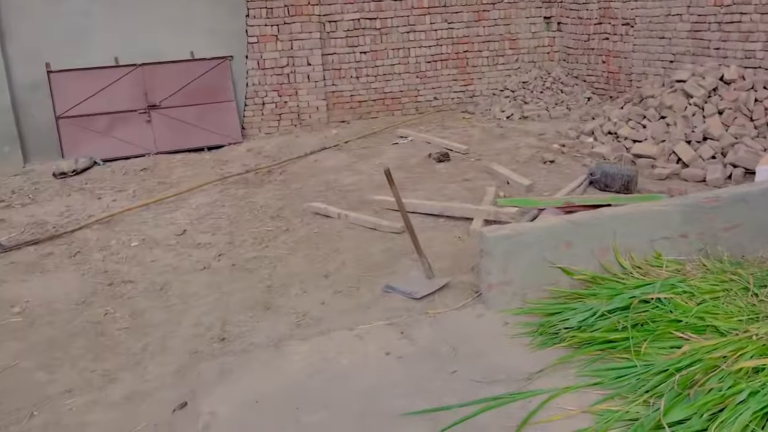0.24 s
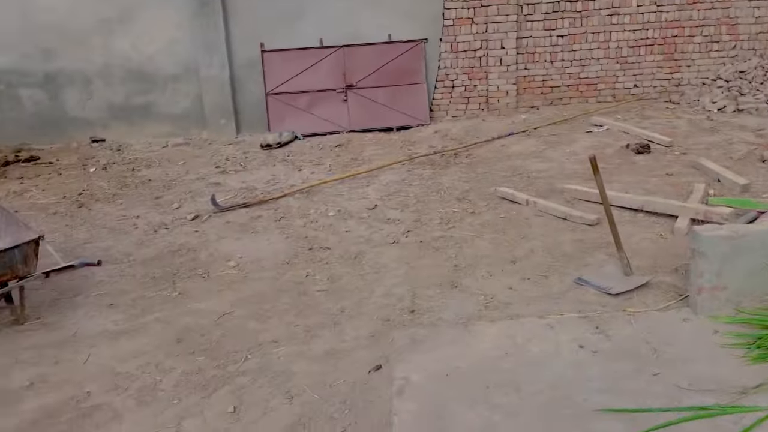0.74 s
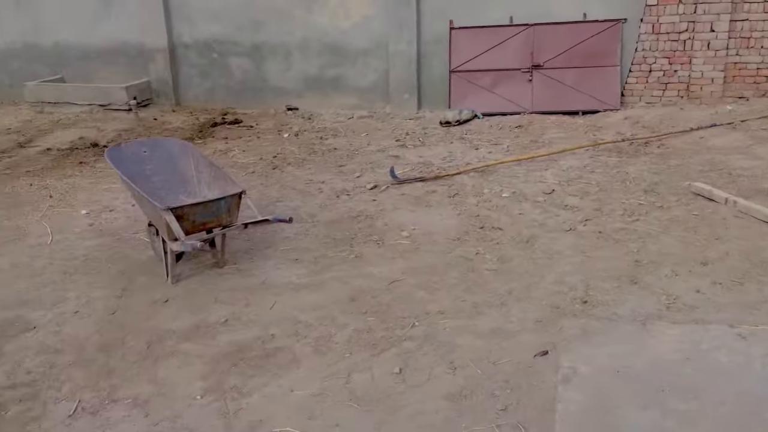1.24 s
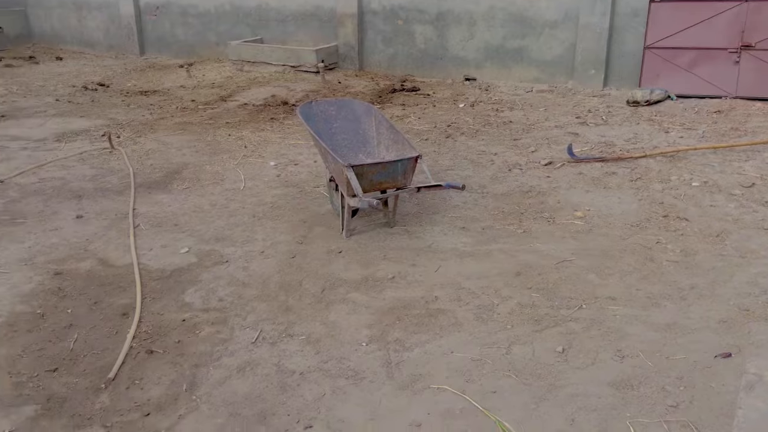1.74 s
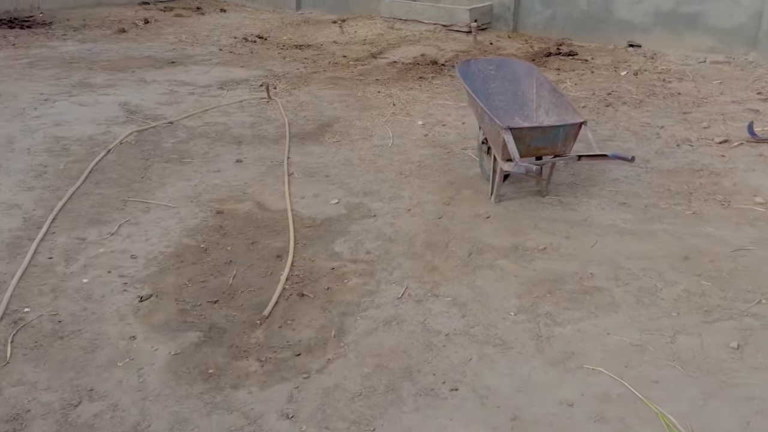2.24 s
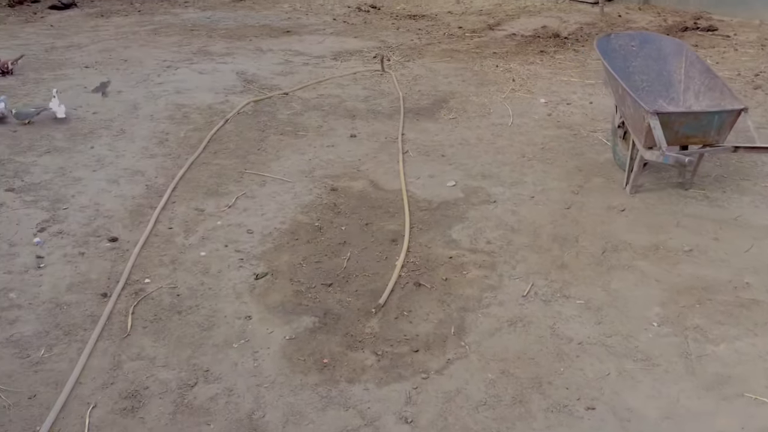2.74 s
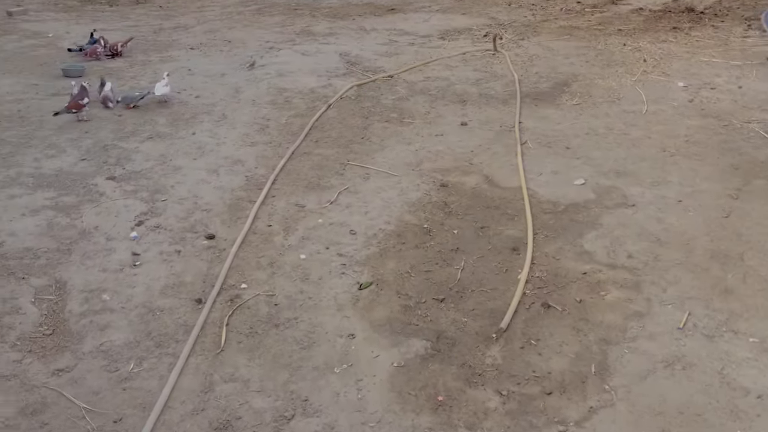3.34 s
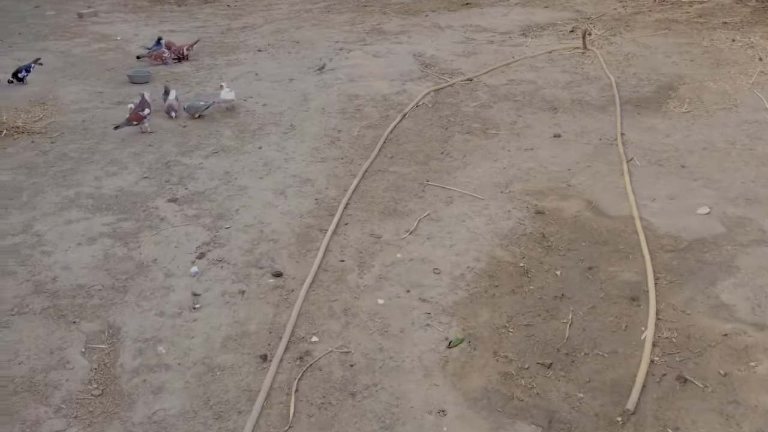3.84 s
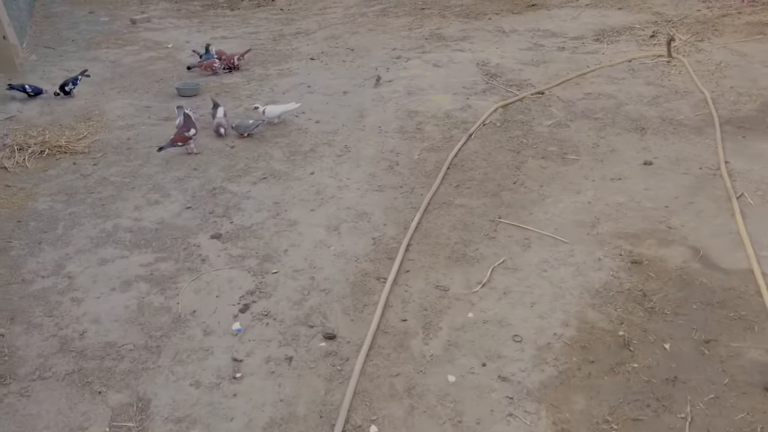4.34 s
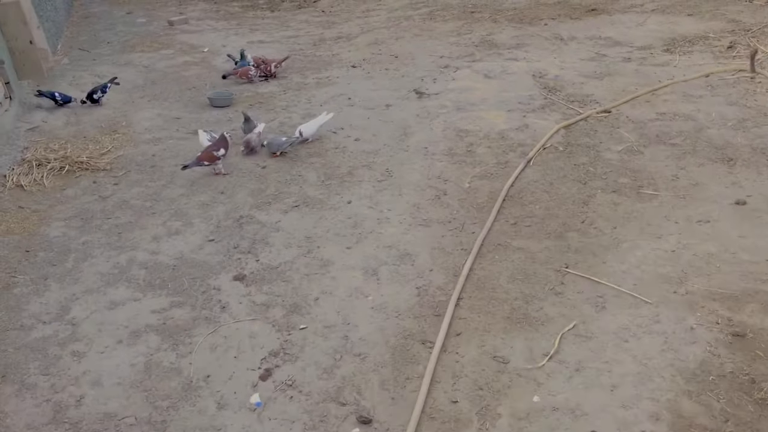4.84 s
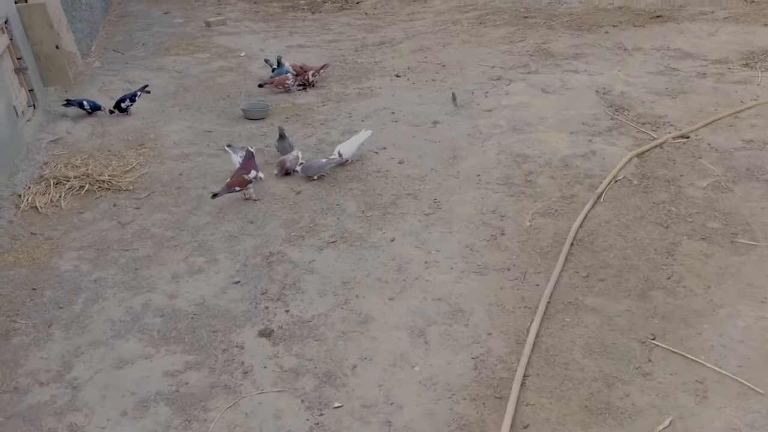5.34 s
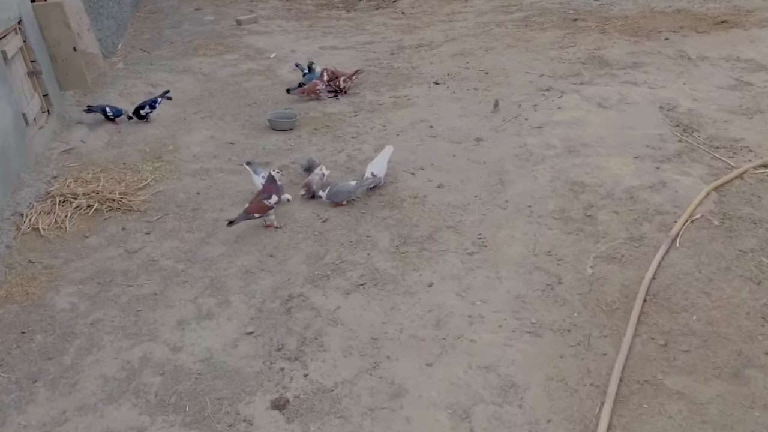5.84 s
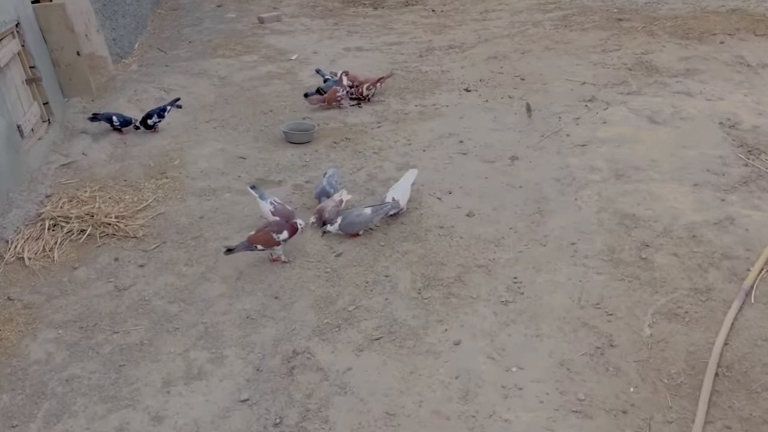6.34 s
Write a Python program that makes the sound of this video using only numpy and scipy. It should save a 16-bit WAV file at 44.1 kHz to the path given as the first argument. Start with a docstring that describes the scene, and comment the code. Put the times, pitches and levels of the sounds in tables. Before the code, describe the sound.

An electric chaff cutter chops green stalks in fast even crunching strokes, gears rattling, fading across a walled yard as wind puffs buffet the microphone.

```python
"""Chaff cutter in a walled yard

An electric chaff cutter chops green fodder, nearly five strokes a second: crowds of short stalk snaps, shaped by
the force of each blade, ring the iron frame. Gears rattle and whine as filtered clicks over a two-partial motor hum.
A hand-held phone turns and moves off; the machine grows fainter, with a brief return near 6.2 s, and echo fills in.
Wind puffs are short falling tones over a noise rumble; scuffs are bands of noise; a small bird chirps twice."""
import sys
import numpy as np
from scipy import signal
from scipy.fft import rfft, irfft
from scipy.io import wavfile
from scipy.ndimage import uniform_filter1d, map_coordinates

SR = 44100
rng = np.random.default_rng(int(sys.argv[2]) if len(sys.argv) > 2 else 0)


def bounce(signal):
    """Save signal as a 16-bit WAV file at the path given by the first command-line argument."""
    frames = np.transpose(np.atleast_2d(signal))
    limited = np.clip(frames, -1, 1)
    pcm = np.round(limited * 32767).astype(np.int16)
    wavfile.write(sys.argv[1], SR, pcm)


N = 291059
TIME = np.arange(N) / SR
FREQS = np.fft.rfftfreq(N, 1 / SR) + 1e-3  # Hz, kept off zero

# distance from the machine and turn of the phone, which runs 0-1: [time_s, distance_m, turned_away]
WALK = [(0, 1.6, 0.03), (1, 2.62, 0.01), (1.9, 2.52, 0.06), (2.4, 3.08, 0.22), (3.5, 4.22, 0.7),
        (4.2, 4.84, 0.64), (5.4, 6.28, 0.85), (6.2, 4.2, 0.7), (6.6, 6.4, 0.87)]
# the phone's two ports: [freq_hz, left_lead_rad, likeness (0-1), left_minus_right_db]
PORTS = [(100, 0, .6, 0), (270, -.8, .8, 1), (480, -1.75, .93, -1.5), (750, -2.35, .93, -3),
         (1350, -2.55, .9, -2.5), (2000, -3, .6, -1), (2400, 2, .55, -1), (3000, 1, .7, -.5),
         (4200, .3, .62, 3), (5100, 1.7, .45, 2), (5800, -1.6, .45, 0), (7000, -1.7, .5, 0),
         (7500, -2.5, .85, 0), (8000, -3.05, .99, 0), (8500, -3.14, 1, 0), (9100, -3.25, .99, 0),
         (10000, -3.9, .8, 0), (12500, -6.2, .82, 0)]
# strength of the breeze on the ports, before trim and gusts: [time_s, rumble_db]
BREEZE = [(0, -35), (1, -36), (1.9, -37), (2.6, -35), (3.5, -32), (3.75, -37.5), (4.1, -43), (5.2, -40.5),
          (6.6, -39.5)]
# puffs of wind on the ports: [centre_s, level_db, pitch_hz, length_s]
PUFFS = [(1.5, -27.5, 82.6, 0.026), (1.589, -26, 90, 0.02), (1.886, -21.5, 75, 0.012),
         (2.469, -17.5, 84, 0.015), (2.518, -18.5, 75, 0.012), (2.541, -27, 81, 0.0095),
         (2.68, -20.5, 94, 0.011), (2.706, -23, 209, 0.011), (2.795, -19, 119, 0.011),
         (2.828, -31, 55, 0.016), (2.868, -26, 266, 0.0087), (2.901, -23, 100, 0.01),
         (3.074, -16.5, 269, 0.019), (3.076, -14, 139, 0.01), (3.096, -16.5, 95, 0.011),
         (3.13, -23, 242, 0.008), (3.139, -18.5, 85, 0.023), (3.212, -17, 121, 0.012),
         (3.314, -19.5, 297, 0.0067), (3.356, -13, 84, 0.013), (3.406, -17.5, 105, 0.016),
         (3.444, -14, 114, 0.026), (3.506, -16, 132.4, 0.025), (3.532, -29, 90, 0.016),
         (3.567, -21, 85, 0.044), (3.598, -24, 131, 0.012), (3.657, -18.5, 116, 0.024),
         (3.877, -23.5, 112, 0.025), (4.426, -21, 112, 0.011), (4.743, -27, 109, 0.01),
         (5.079, -30, 95, 0.009), (5.39, -25.5, 116, 0.012), (5.645, -23, 150, 0.012),
         (6.226, -25, 84, 0.011), (6.274, -20, 81.6, 0.014), (6.305, -26, 300, 0.008),
         (6.361, -17.5, 250, 0.0066), (6.364, -17, 141, 0.0064), (6.387, -22.5, 286, 0.0039)]
# spectrum of the low wind rumble: [freq_hz, level_db]
RUMBLE_SPECTRUM = [(20, -58), (40, -2.5), (65, 2.5), (110, -2.5), (180, -9), (400, -21.5), (1000, -91)]
# spectra of the soft rush of air and of the turbulence inside a puff: [freq_hz, level_db]
RUSH_SPECTRUM = [(120, 4.0), (220, 9), (340, 3.5), (480, 2.5), (900, -48)]
FLUTTER_SPECTRUM = [(70, 7.5), (150, 2.0), (290, -2), (450, -13.5), (1200, -63)]
# two notes of a small bird: [start_s, level_db, pitch_hz]
CHIRPS = [(3.987, -37, 4000), (4.054, -31.5, 3950)]
# small scuffs, ticks and a longer rustle close by: [centre_s, level_db, centre_hz, width_octaves, length_s]
SCUFFS = [(2.125, -30.5, 1500, 0.78, 0.022), (3.702, -41, 6000, 0.71, 0.0051),
          (3.787, -41, 12000, 0.22, 0.045), (3.831, -34, 1940, 1, 0.023),
          (4.281, -38.5, 5800, 0.71, 0.0068), (4.282, -40, 12200, 0.64, 0.0066),
          (4.931, -33, 1810, 1.34, 0.057), (5.125, -31, 1490, 1, 0.024)]
# spectrum of the gear rattle: [freq_hz, level_db]
GEAR_SPECTRUM = [(110, 11.5), (220, 5), (500, 3), (700, 5.5), (950, 1), (1080, 3.5), (1300, 1.5),
                 (1600, 2.5), (2100, -1.5), (2550, -1.5), (4000, -10.5), (5600, -10.5), (7000, -11.5),
                 (9300, -11), (11500, -8), (14000, -77)]
# whine of the meshing gears: [pitch_hz, width_hz, level_db]
WHINE_MODES = [(860, 26, -3), (983, 15, -3.5), (1062, 19, 1), (1740, 70, -7.5), (2507, 50, -6.5)]
# dry stalks that split with a bright crack: [start_s, level_db, centre_hz]
CRACKS = [(0.048, -25, 3160), (0.470, -15, 2420), (0.538, -23, 2880), (0.899, -21, 2480),
          (1.154, -18, 3020), (1.327, -15.5, 3020), (1.59, -24, 3040), (1.792, -28, 2400),
          (1.815, -29, 2900), (2.011, -27, 2130), (2.25, -20.5, 2050), (2.611, -27, 2000),
          (3.042, -23, 2600), (3.125, -24.5, 2840), (3.906, -29, 2350), (3.984, -24, 2370),
          (4.747, -28, 2070), (4.77, -32, 2240), (4.844, -26, 2590), (5.701, -30, 2630), (6.054, -31, 2200),
          (6.461, -34, 2740)]
# thick stalks that knock against the mouth plate: [start_s, level_db, pitch_hz]
KNOCKS = [(0.045, -10, 453), (0.294, -10.5, 341), (0.472, -9.5, 451), (0.717, -11, 354), (0.936, -6.5, 579),
          (1.148, -3.5, 513), (1.369, -7.5, 560), (1.549, -12.5, 572), (1.766, -6.5, 555),
          (2.005, -11, 567), (2.177, -15, 745), (2.439, -22, 514), (2.607, -20, 636), (2.651, -21, 485),
          (2.839, -29, 766), (2.863, -24, 483), (3.471, -22, 507), (3.512, -14.5, 446), (3.905, -17.5, 433),
          (4.156, -24, 920), (4.333, -32, 686), (4.548, -18, 810), (4.837, -21, 850), (5.033, -24, 960),
          (5.192, -21.5, 653), (5.623, -30, 969), (5.873, -21, 840), (6.459, -20.5, 794)]
# blade strokes, one at each half turn of the flywheel: [start_s, extra_bite_db, extra_shear_db, extra_crunch_db]
STROKES = [(0.023, 1, 2.5, 1), (0.235, 2.5, 0, -1.5), (0.452, 3, 2, 1.5), (0.666, 0.5, -2, 0.5),
           (0.882, 2, 0, 0.5), (1.094, -1, 0, 0), (1.31, 3.5, 1.5, 3.5), (1.522, -0.5, 0.5, 1),
           (1.739, 1, 1.5, 3), (1.95, 1.5, 1, 0), (2.169, 3, 1, 1), (2.384, 4, -3, -0.5),
           (2.599, 4.5, -2.5, 3), (2.817, 0.5, -2, 2.5), (3.033, 5, 1, 4), (3.25, 3, 0, 2),
           (3.466, 3.5, -3, 2.5), (3.683, 0, 1.5, 4.5), (3.898, 4, -0.5, 3), (4.112, 1.5, -4, 1.5),
           (4.327, 5, -3.5, 1.5), (4.541, 0.5, 0, 2.5), (4.754, 2.5, 2, 5), (4.968, 4, -1, 5),
           (5.184, 5.5, -3, 3.5), (5.395, 3, -1, 0.5), (5.611, 3, 0, -8), (5.822, 4, -3, 0),
           (6.035, 2, 1, 4.5), (6.231, 2, -1.5, 4.5), (6.445, 0, 1, 5)]
# rings of the iron frame and flywheel: [pitch_hz, width_hz, level_db]
FRAME_MODES = [(363, 31, 0), (538, 56, 2), (665, 17, 5), (791.5, 24, 6.5), (952, 14, 5), (1237, 11, 7.5),
               (1677, 17, -9.5), (1827, 26, 1)]
# spectrum of the chop beside the machine: [freq_hz, level_db]
CHOP_NEAR_SPECTRUM = [(90, -11), (200, -2.5), (350, -7), (430, -3.5), (530, 2), (680, -5.5), (960, 3),
                      (1200, -3), (1500, -5.5), (2100, -18.5), (3200, -70)]
# spectrum of the chop across the yard: [freq_hz, level_db]
CHOP_FAR_SPECTRUM = [(90, -20), (200, 5.5), (310, 2), (450, -3), (560, -5.5), (800, -4), (1000, -1),
                     (1230, -2.5), (1500, -4.5), (2100, -8.5), (3200, -15.5)]
# spectrum of the crunching stalks: [freq_hz, level_db]
CRUNCH_SPECTRUM = [(1200, -1.5), (2100, 2), (2900, 6), (4000, -3.5), (5200, -2.5), (5600, -13), (6200, -1),
                   (7200, -8), (9500, -86)]
# spectrum of the chaff spray: [freq_hz, level_db]
SPRAY_SPECTRUM = [(4800, -6), (6000, 0), (8000, 1.5), (10000, 3), (11700, 1), (12800, -6), (14000, -17),
                  (15000, -26)]
# spectrum of the blade clack: [freq_hz, level_db]
CLACK_SPECTRUM = [(300, -10), (450, 2.0), (900, -5.0), (1800, 3.5), (3000, -42.0), (6000, -43)]

NEAR_M = 2  # distance at which the machine has no distance loss
TOP_HZ = 14900  # top of the phone's range
# the walker's body comes between phone and machine and shades the crunch and spray
SHADE_FROM_S, SHADE_TO_S, SHADE_DB = 1.2, 1.9, 7
# share by which the pitch of an eddy falls per length; level of the turbulence inside it
PUFF_SAG, PUFF_FLUTTER_DB = 0.48, -10
SCUFF_RISE = 0.59  # the swell of a scuff as a share of its length
# share by which a chirp starts high; time to settle; fade
CHIRP_DROP, CHIRP_GLIDE_S, CHIRP_DECAY_S = 0.156, 0.0035, 0.013
HUM_HZ, HUM_DB, HUM_AWAY_DB = 99.2, -39.5, -17  # mean pitch; base level at NEAR_M; change once turned away
GEAR_DB, GEAR_FALL = -28, 0.64  # base level at NEAR_M; share of the distance loss, as the yard holds this sound
# just before each bite the feed gears drop: how far ahead, how long, how deep
LULL_LEAD_S, LULL_S, LULL_DB = 0.021, 0.02, -3
RING_DRIFT, WHINE_DRIFT = 0.012, 0.004  # spread of the pitch, as a share
CRACK_RISE_S, CRACK_DECAY_S = 0.003, 0.01
STROKE_S = 0.097  # time a blade takes to pass through the bundle
# base levels of one stroke at NEAR_M, before the trims of each part
BITE_DB, SHEAR_DB, CRUNCH_DB, SPRAY_DB, CLACK_DB = -19, -16, -25.5, -26.5, -27.5
# change of each part of the stroke once turned fully away
BITE_AWAY_DB, SHEAR_AWAY_DB, CRUNCH_AWAY_DB, SPRAY_AWAY_DB, CLACK_AWAY_DB = 0, -2.5, -3.5, -4, 5
CHOP_RISE_S, CHOP_FALL_S, CRUNCH_RISE_S, CRUNCH_FALL_S = 0.026, 0.046, 0.02, 0.034
# the blade reaches the lower ledge of the mouth this long after the bite; level against the first clack
LEDGE_S, LEDGE_DB = 0.0463, -4


def undb(db):
    """Decibels to gain."""
    return 10 ** (np.asarray(db) / 20)


def unit(x):
    """Scale to rms 1."""
    return x / np.sqrt(np.mean(x ** 2))


def colour(x, points):
    """Filter by a (Hz, dB) spectrum that falls away past its ends; rms 1."""
    hz, db = np.transpose(points)
    low_skirt = 1 / (1 + (hz[0] / 2 / FREQS) ** 4)
    high_skirt = 1 / (1 + (FREQS / hz[-1] / 2) ** 4)
    gain = undb(np.interp(np.log(FREQS), np.log(hz), db))
    return unit(irfft(rfft(x) * low_skirt * high_skirt * gain, N))


def band_pass(x, order, edges_hz):
    """Keep the band between two edges."""
    return signal.sosfilt(signal.butter(order, edges_hz, "band", fs=SR, output="sos"), x)


def wander(rate):
    """Smooth random motion with rms 1; rate is in new values a second."""
    k = int(SR / rate)
    steps = np.repeat(rng.standard_normal(N // k + 1), k)
    return unit(uniform_filter1d(steps, k)[:N])


def drift(x, share, rate):
    """Let the pitch of every row stray by a small share."""
    at = np.arange(N) + np.cumsum(share * wander(rate))
    return np.array([map_coordinates(row, [at], mode="mirror") for row in x])


def snaps(rate, spread_db):
    """Dense clicks of uneven size; rows: direct, scattered to the left, scattered to the right."""
    struck = rng.random((3, N)) < rate / SR
    return struck * rng.standard_normal((3, N)) * undb(spread_db * rng.standard_normal((3, N)))


def stalks(rate, low_hz, high_hz, decay, spread_db):
    """Every stalk cracks with a brief decaying pitch of its own; same rows as the clicks, rms 1."""
    draws = rng.random((int(rate * N / SR), 6))
    t = TIME[:SR // 50]
    out = np.zeros((3, N + len(t)))
    starts = (draws[:, 0] * N).astype(int)
    hz = low_hz + (high_hz - low_hz) * draws[:, 1:2]
    tones = undb(spread_db * draws[:, 2:3] ** 2) * np.exp(t * (2j * np.pi * hz - 1 / decay))
    turns = np.exp(2j * np.pi * draws[:, 3:, None])  # a random phase in each row
    for i, tone, turn in zip(starts, tones, turns):
        out[:, i:i + len(t)] += (tone * turn).real
    return unit(out[:, :N])


def ring(x, modes):
    """Sound the (Hz, width, dB) resonances of a body; rms 1."""
    response = 0
    for hz, width, db in modes:
        detuning = (FREQS ** 2 - hz ** 2) / (FREQS * width)
        response = response + undb(db) / np.sqrt(width) / (1 + 1j * detuning)
    return unit(irfft(rfft(x) * response, N))


def wind(rumble_db):
    """Eddies buffet the ports as short falling tones, over a low uneven rumble and a soft rush of air."""
    air = rng.standard_normal((3, N))
    air = air[0] + 0.95 * air[1:]  # partly shared by the two ports
    gusts_db = 2.6 * wander(22)
    out = colour(air, RUMBLE_SPECTRUM) * undb(rumble_db + 1.5 + gusts_db)
    out += colour(rng.standard_normal((2, N)), RUSH_SPECTRUM) * undb(-42.0 + 2 * wander(15))
    flutter = colour(air, FLUTTER_SPECTRUM)
    for s, db, hz, length in PUFFS:
        near = slice(max(int((s - 2 * length) * SR), 0), int((s + 2 * length) * SR))
        t = TIME[near] - s
        phase = 2 * np.pi * rng.random() + 0.22 * rng.standard_normal((2, 1))
        cycles = hz * t * (1 - PUFF_SAG * t / length / 2)
        eddy = np.sqrt(2) * np.cos(2 * np.pi * cycles + phase)
        puff = undb(-2.3) * eddy + undb(PUFF_FLUTTER_DB) * flutter[:, near]
        out[:, near] += undb(db) * np.exp(-2 * (t / length) ** 2) * puff
    return out


def chirps():
    """A small bird chirps twice, alike at both ports; each note drops quickly onto its pitch."""
    out, t = np.zeros(N), TIME[:SR // 10]
    swell = np.exp(-t / CHIRP_DECAY_S) * (1 - np.exp(-t / 0.002))
    for s, db, hz in CHIRPS:
        glide = CHIRP_DROP * np.exp(-t / CHIRP_GLIDE_S)
        pitch = hz * (1 + glide + 0.015 * wander(500)[:len(t)])
        i = int(s * SR)
        out[i:i + len(t)] += undb(db) * swell * np.sin(2 * np.pi * np.cumsum(pitch) / SR)
    return out


def scuffs():
    """Gritty rubs close to the phone that start quickly and trail off, much alike at both ports."""
    out = np.zeros((2, N))
    for s, db, hz, octaves, length in SCUFFS:
        edges_hz = [hz * 2 ** (-octaves / 2), min(hz * 2 ** (octaves / 2), SR / 3)]
        noise = rng.standard_normal((3, N))
        grit = unit(band_pass(noise[0] + noise[1:] / 2, 3, edges_hz))
        span = length * np.where(TIME < s, SCUFF_RISE, 1)
        out += undb(db) * grit * np.exp(-2 * np.minimum(np.abs(TIME - s) / span, 10) ** 2)
    return out


def motor_hum(hum_db):
    """The motor hums on a wavering pitch and its octave."""
    phase = 2 * np.pi * np.cumsum(HUM_HZ * (1 + 0.0213 * wander(10))) / SR
    tone = unit(np.sin(phase) + undb(-7.5) * np.sin(2 * phase))
    return tone * undb(hum_db + 3.5 * wander(13))


def feed_lull():
    """Level of the feed gears, dB: a short dip ahead of every blade."""
    dips = 0
    for s in np.transpose(STROKES)[0]:
        dips = dips + np.exp(-2 * np.minimum(np.abs(TIME - s + LULL_LEAD_S) / LULL_S, 10) ** 2)
    return LULL_DB * dips


def gear_rattle():
    """Teeth strike one another in dense clicks and small ringing cracks."""
    teeth = unit(snaps(6000, 0.82)) + 0.5 * stalks(700, 295, 5995, decay=0.017, spread_db=6.5)
    return colour(teeth, GEAR_SPECTRUM) * undb(-2.5 + 1.6 * wander(70) + 0.47 * wander(12))


def gear_whine(away):
    """Clicks of the mesh sound drifting resonances, fainter once the phone is turned away."""
    whine = drift(ring(snaps(3500, 2.5), WHINE_MODES), WHINE_DRIFT, 5) * undb(-7.0 - 11.0 * away)
    load_db = 1.7 * wander(16)  # the teeth load and unload
    return whine * undb(2.5 + load_db)


def cracks():
    """A dry stalk splits: a sudden shower of splinters that dies within a few hundredths of a second."""
    out, t = np.zeros((3, N)), TIME[:SR // 8]
    splinters = unit(snaps(6000, 2.2))
    burst = np.exp(-t / CRACK_DECAY_S) * (1 - np.exp(-t / CRACK_RISE_S))
    for s, db, hz in CRACKS:
        near = slice(int(s * SR), int(s * SR) + len(t))
        shower = unit(band_pass(splinters[:, near], 2, [hz * .72, hz * 1.35]))
        out[:, near] += undb(db) * burst * shower
    return out


def knocks():
    """A thick stalk slams down: a short crack and a quickly damped ring of the mouth plate."""
    out, t = np.zeros((3, N)), TIME[:SR // 8]
    for s, db, hz in KNOCKS:
        plate = np.sin(2 * np.pi * hz * t) * np.exp(-t / 0.0079) * (1 - np.exp(-t / 0.0034))
        crack = band_pass(rng.standard_normal((3, len(t))), 2, [500, 2000]) * np.exp(-t / 0.01)
        i = int(s * SR)
        out[:, i:i + len(t)] += undb(db) * (undb(-2.0) * plate + undb(-13.0) * crack)
    return out


def clacks(starts, stroke_db, late, rise, decay):
    """A dry, woody clack as a blade lands on the bundle or crushes it against the ledge."""
    hits = np.zeros(N)
    for s, db in zip(starts + late, stroke_db):
        near = slice(int(s * SR), int(s * SR) + SR // 10)
        t = TIME[near] - s
        hits[near] += undb(CLACK_DB + db) * np.exp(-t / decay) * np.clip(t / rise, 0, 1)
    return hits * colour(snaps(5000, 3.9), CLACK_SPECTRUM)


def blade_force(starts, bite_db, shear_db, rise, fall, late, sag_db, jolt_db):
    """Force of the blades: a brush of leaves, a jolt at the bite, a change inside the bundle, then the shear."""
    force = np.zeros(N)
    for s, bite, shear in zip(starts, bite_db, shear_db):
        inside = s + late + (STROKE_S - late) * np.array([0, .2, .42, .68, 1])
        touch = inside[0] - .004
        times = [touch - 2 * rise, touch, *inside, inside[-1] + 2 * fall]
        middle = (bite + shear) / 2 - sag_db
        levels = [bite - 30, bite - jolt_db, bite, bite, middle, shear, shear - 2, shear - 40]
        near = slice(max(int(times[0] * SR), 0), int(times[-1] * SR))
        force[near] += undb(np.interp(TIME[near], times, levels))
    return force


def spray(starts, spray_db, tearing):
    """Chaff sprays off the flywheel: a very dense, high hiss of clicks."""
    hiss = colour(snaps(14000, 0.62), SPRAY_SPECTRUM) * undb(-1.4 + 0.89 * tearing + 0.72 * wander(36))
    return hiss * blade_force(starts, spray_db, spray_db + 1.0, rise=0.023, fall=0.012,
                              late=0.0021, sag_db=1.5, jolt_db=6.0)


def crunch(starts, crunch_db, thick_db, tearing):
    """Fibres shred and splinter brightly under the blade."""
    splinters = 1.4 * unit(snaps(3000, 3.0)) + stalks(900, 1328, 8000, decay=0.031, spread_db=9.0)
    shred_db = 1.5 * tearing + .7 * wander(260)
    shred = colour(splinters, CRUNCH_SPECTRUM) * undb(-2.95 + shred_db)
    return shred * blade_force(starts, crunch_db + 0.5 + 0.15 * thick_db, crunch_db + 2.5,
                               rise=CRUNCH_RISE_S, fall=CRUNCH_FALL_S, late=0.014, sag_db=1.0, jolt_db=2.0)


def snapping(spectrum):
    """Crowds of snapping stalks, coloured by a spectrum for their place in the yard."""
    crowd = 1.6 * unit(snaps(2600, 0.87)) + stalks(420, 181.0, 2602, decay=0.012, spread_db=0)
    return colour(crowd, spectrum)


def chop(starts, bite_db, shear_db, tearing, away):
    """Stalks snap in crowds and ring the iron frame, near colour giving way to far as the phone turns."""
    near, far = snapping(CHOP_NEAR_SPECTRUM), snapping(CHOP_FAR_SPECTRUM)
    frame = drift(ring(snaps(2600, 2.3), FRAME_MODES), RING_DRIFT, 10)
    body = undb(-2.5) * (np.sqrt(1 - away) * near + np.sqrt(away) * far) + undb(-7.5) * frame
    force = blade_force(starts, bite_db, shear_db, rise=CHOP_RISE_S, fall=CHOP_FALL_S,
                        late=0.0048, sag_db=-0.5, jolt_db=7.5)
    return body * force * undb(-2.5 + 1.2 * tearing)


def cutting(loss_db, away):
    """Every blade stroke sounds its chop, crunch, spray and two clacks, set by distance and turn."""
    starts, thick_db, tough_db, crisp_db = np.transpose(STROKES)
    turned = np.interp(starts, TIME, away)
    stroke_db = -np.interp(starts, TIME, loss_db)
    treble_db = stroke_db - SHADE_DB * np.interp(starts, [SHADE_FROM_S, SHADE_TO_S], [0, 1])
    bite_db = stroke_db + thick_db + BITE_DB + BITE_AWAY_DB * turned
    shear_db = stroke_db + tough_db + SHEAR_DB + SHEAR_AWAY_DB * turned
    crunch_db = treble_db + crisp_db + CRUNCH_DB + CRUNCH_AWAY_DB * turned
    spray_db = treble_db + SPRAY_DB + SPRAY_AWAY_DB * turned
    clack_db = stroke_db + CLACK_AWAY_DB * turned
    tearing = wander(110)  # the bundle gives way in jerks
    out = chop(starts, bite_db, shear_db, tearing, away)
    out += crunch(starts, crunch_db, thick_db, tearing)
    out += spray(starts, spray_db, tearing)
    out += clacks(starts, clack_db + thick_db, late=0.001, rise=0.014, decay=0.023)
    out += clacks(starts, clack_db + tough_db + LEDGE_DB, late=LEDGE_S, rise=0.012, decay=0.02)
    return out


def yard(x, t60, delay):
    """The far walls send back a thin, scattered echo some tens of milliseconds late."""
    t = TIME[:SR // 3]
    swell = np.clip(t / delay, 0, 1) ** 2
    tail = rng.standard_normal((3, len(t))) * undb(-60 * np.abs(t - delay) / t60) * swell
    tail /= np.sqrt(np.sum(tail ** 2) / 3)
    echo = signal.fftconvolve(x[None], tail, axes=1)[:, :N]
    return signal.sosfilt(signal.butter(1, 3200, "high", fs=SR, output="sos"), echo)


def ports(x, away):
    """Direct sound reaches the ports out of step; turning away lines up the lows and leaves more scatter."""
    hz, s, z = signal.stft(x, SR, nperseg=512)
    table_hz, *columns = np.transpose(PORTS)
    lead, alike, pan_db = (np.interp(hz, table_hz, c)[:, None] for c in columns)
    turned = np.interp(s, TIME, away) * (hz < 2200)[:, None]
    lead = lead * (1 - .8 * turned ** 2)
    alike = alike * (1 - .55 * turned)
    left = np.sqrt(alike) * z[0] * np.exp(1j * lead) + np.sqrt(1 - alike) * z[1]
    right = np.sqrt(alike) * z[0] + np.sqrt(1 - alike) * z[2]
    panned = np.array([left * undb(pan_db / 2), right * undb(-pan_db / 2)])
    return signal.istft(panned, SR)[1][:, :N]


def scene():
    """The machine grows fainter, with a brief return near 6.2 s; the yard echo is fed more as the phone turns away."""
    s, *columns = np.transpose(WALK)
    distance_m, away = (np.interp(TIME, s, c) for c in columns)
    away = np.clip(away, 0, 1)
    loss_db = 20 * np.log10(distance_m / NEAR_M)
    gear_db = GEAR_DB - GEAR_FALL * loss_db + feed_lull()
    gears = (gear_rattle() + gear_whine(away)) * undb(gear_db)
    hum = motor_hum(HUM_DB - loss_db + HUM_AWAY_DB * away)
    blades = cutting(loss_db, away) + knocks() + cracks()
    echo = yard(blades[0] * undb(-15.5 + 19.2 * away), t60=0.12, delay=0.052)
    machine = ports(blades + echo + gears + hum, away)
    breeze_db = np.interp(TIME, *np.transpose(BREEZE))
    return machine + wind(breeze_db) + scuffs() + chirps()


def record(dry):
    """The phone drops the deepest rumble and cuts the top."""
    thinned = signal.sosfilt(signal.butter(2, 30, "high", fs=SR, output="sos"), dry)
    return signal.sosfilt(signal.ellip(8, .2, 70, TOP_HZ, fs=SR, output="sos"), thinned)


dry = scene()
out = record(dry)
bounce(out)
```